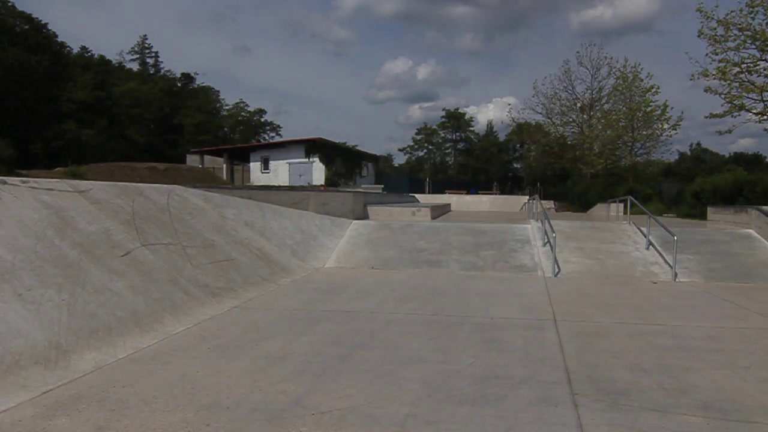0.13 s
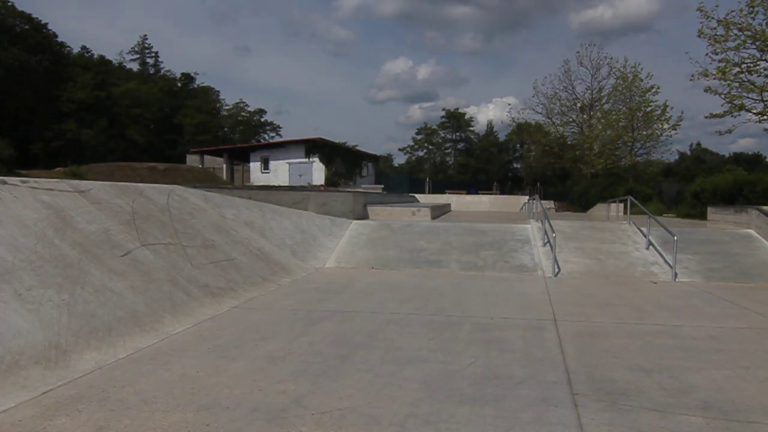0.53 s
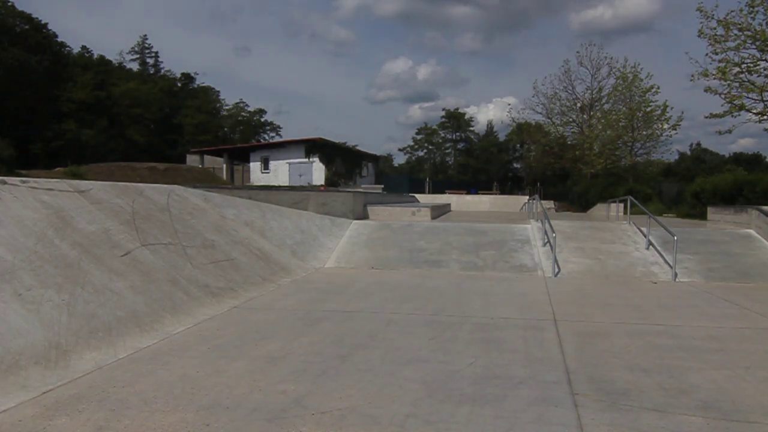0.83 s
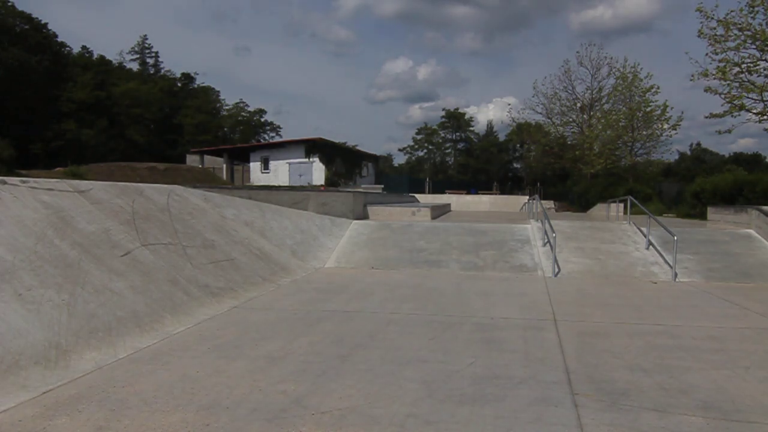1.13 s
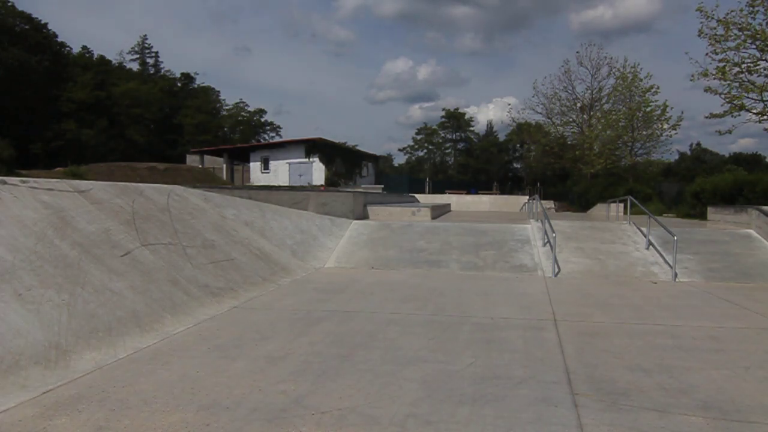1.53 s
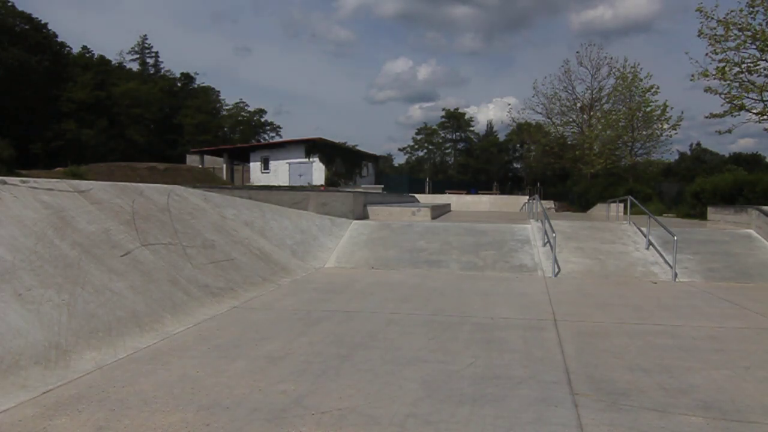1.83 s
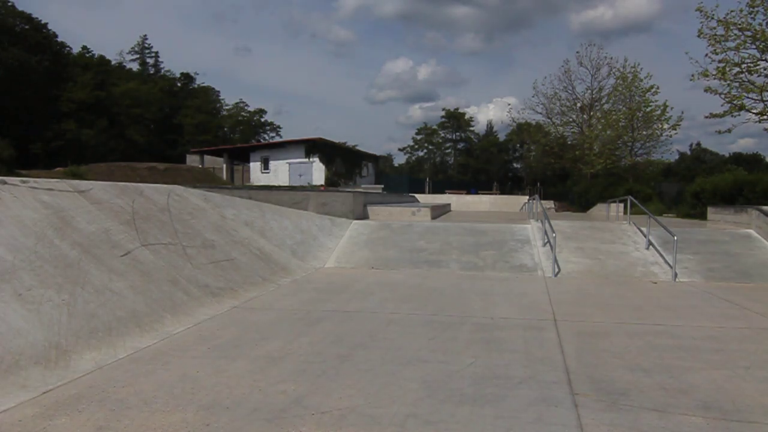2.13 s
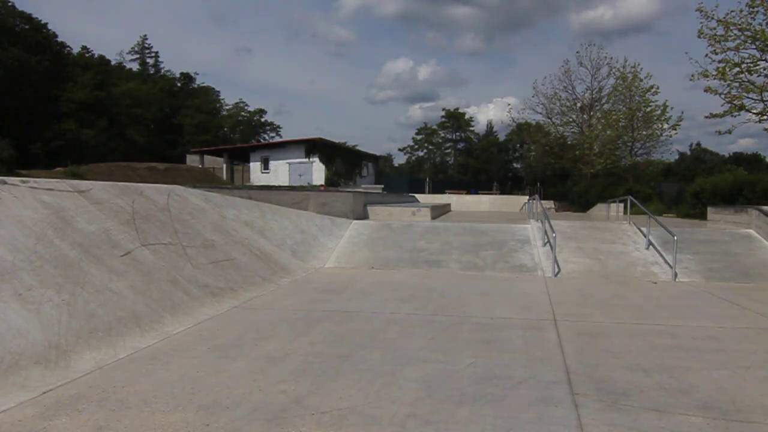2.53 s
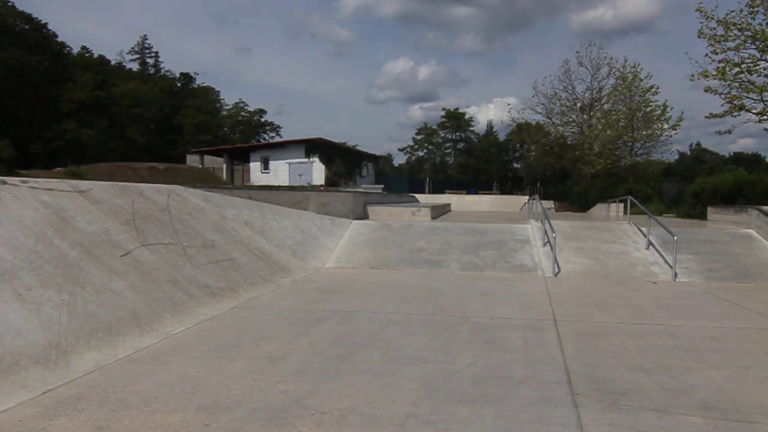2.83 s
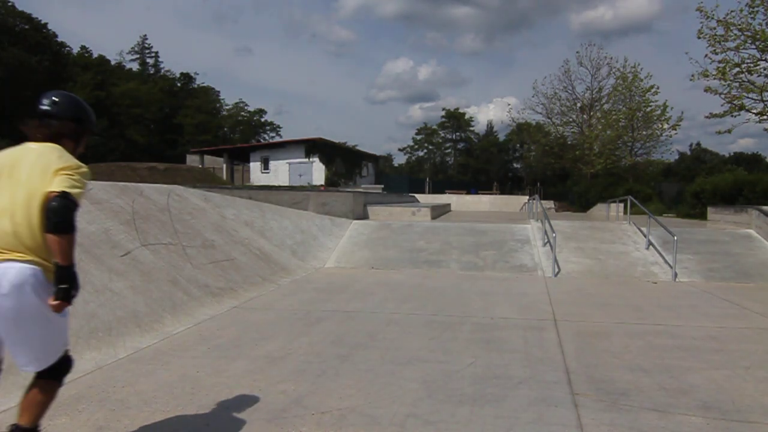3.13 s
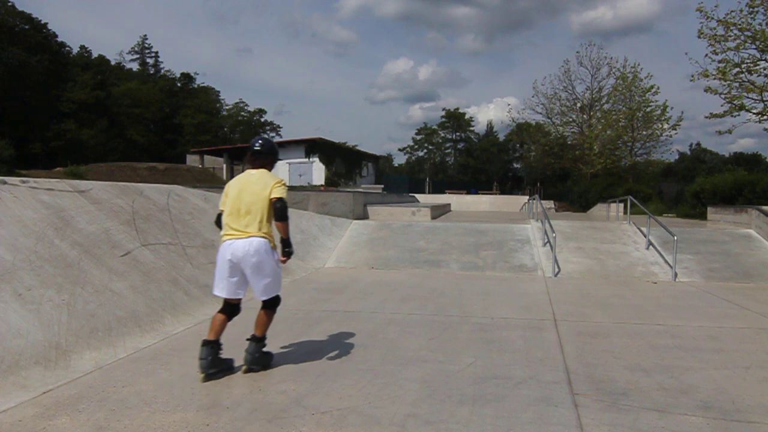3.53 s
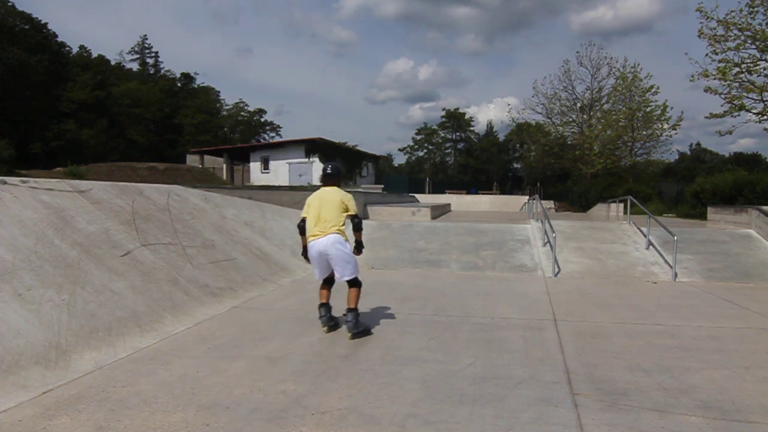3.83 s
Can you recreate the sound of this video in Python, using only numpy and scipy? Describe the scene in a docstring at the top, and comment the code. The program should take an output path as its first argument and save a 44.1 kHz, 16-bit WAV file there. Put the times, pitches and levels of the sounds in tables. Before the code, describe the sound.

Inline skate wheels hum faintly on concrete and grow louder, with a soft puff of wind at 0.7 seconds. A clack comes at 1.4 seconds and a louder cluster around 2.2. The wheels hiss, scuff near 2.7 and tick rapidly as they pass close by. More sharp, slightly echoing clacks land around 3.2 seconds, then the skates roll away with a thin swish near 3.9.

```python
"""A skater rolls past

An inline skater comes up across a concrete skatepark, passes close by and rolls away. The wheels drone, hiss on
the grit, scuff in a turn, tick as they slip and rattle, and clack on landings and joints. The ramps echo the
clacks and ticks, and a little wind rumbles on the microphone."""
import sys
import numpy as np
from scipy import signal
from scipy.fft import rfft, irfft, next_fast_len
from scipy.io import wavfile

SR = 44100
rng = np.random.default_rng(int(sys.argv[2]) if len(sys.argv) > 2 else 0)


def wav_out(sig):
    """Save sig, one row per channel (or a flat mono array), as 16-bit PCM at SR to the path in sys.argv[1]."""
    wavfile.write(sys.argv[1], SR, np.round(np.clip(np.atleast_2d(sig).T, -1, 1) * 32767).astype(np.int16))


N = 176400
T = np.arange(N) / SR

# How loud each sound is as time goes by. Each row: time in seconds, level in dB.
WIND_LEVELS = [(0, -59.5), (.62, -57.5), (.693, -30), (.72, -56), (2.4, -60), (4, -55)]
AIRY_LEVELS = [(0, -54.5), (.22, -56.5), (.45, -64), (2.6, -65), (3.2, -45.5), (3.5, -55)]
GRIT_LEVELS = [(0, -61), (1.1, -58), (1.82, -55.5), (1.88, -47.5), (2.3, -40.5), (2.56, -47), (2.85, -40.5),
               (3.25, -41), (3.35, -55), (3.55, -52.5), (3.63, -46.5), (4, -47)]
SCUFF_LEVELS = [(2.6, -50), (2.63, -43.5), (2.71, -33.5), (2.75, -36), (2.78, -35), (2.86, -48.5)]
# The drone of the wheels. Each row: time in seconds, level in dB, pitch of their ring in Hz.
DRONE_CURVE = [(0, -54, 1080), (.4, -51.5, 1077), (1.6, -46.5, 1095), (2.2, -42, 1060), (3.2, -41.5, 1027),
               (3.45, -42.5, 969), (4, -41, 965)]

# The tone of each sound, from bass to treble. Each row: frequency in Hz, relative strength in dB.
WIND_TONE = [(28, -22), (95, -8), (165, -20), (1200, -79)]
AIRY_TONE = [(4000, -18), (8500, -2), (16000, -4.5)]
GRIT_TONE = [(600, -3.5), (2200, 2), (3700, -2), (5200, -1.5), (9000, -14), (16000, -20.5)]
DRONE_TONE = [(30, -9), (80, -2), (230, 0), (550, -4), (1200, 1), (1700, -8.5), (5000, -23.5), (16000, -66)]
SCUFF_TONE = [(90, -16), (200, -26), (600, -3.5), (2300, -1), (6000, -9.5), (14000, -27)]
HIGH_TICK_TONE = [(2500, -23), (4900, 6), (9000, -9), (12500, -24)]
LOW_TICK_TONE = [(1100, -26), (2600, -11), (5500, -34.5)]
KNOCK_TONE = [(120, -9), (380, -1.5), (780, -3), (1200, -2.5), (1600, -13.5), (8000, -38)]
CRACK_TONE = [(600, -26.5), (1900, 5), (3200, 1.5), (5700, -1), (15000, -28)]
SPLASH_TONE = [(3500, 6), (8800, -1.5), (10300, 5.5), (15000, -10)]

# Thin squeaks, and a bright swish as the skater carves away. Each row: start and length in seconds,
# level in dB, first and last pitch in Hz, width of the band in Hz.
THIN_SQUEAKS = [(.078, 0.059, -40, 3600, 3980, 220), (2.071, 0.012, -36.5, 3800, 3580, 500),
                (3.97, .028, -33.5, 4930, 6020, 600)]
CARVING_SWISH = [(3.783, 0.22, -34.5, 13100, 7800, 5940)]
# The squeal of the tread. Each row: pitch in Hz, width of the band in Hz, relative level in dB.
TREAD_SQUEALS = [(1850, 450, -6), (4900, 1000, -7)]
# Ticks of the wheels: slips of the tread, and at 2.34-2.42 s and 3.43-3.46 s a rattle once per turn of a wheel.
# Each row: start in seconds, relative levels of the high and low ring in dB.
WHEEL_TICKS = [(2.338, -32, -49), (2.356, -27, -66), (2.3979, -26.5, -43), (2.416, -29.5, -47),
               (2.9125, -39, -34), (2.9273, -28.5, -35), (2.935, -28, -31.5), (2.953, -26, -33),
               (2.967, -27, -34), (2.985, -24.5, -32.5), (2.9952, -24, -35), (3.017, -25.5, -39),
               (3.039, -24.5, -35), (3.0546, -24.5, -38), (3.0617, -26, -39), (3.1144, -29, -31.5),
               (3.369, -41, -36), (3.386, -46, -34.5), (3.4261, -28, -47), (3.4392, -27.5, -41.5),
               (3.456, -28.5, -42), (3.695, -44, -31.5), (3.7096, -38, -33)]
# Hits on landings and joints. Each row: start in seconds, boot thump in dB, thump pitch in Hz,
# frame knock in dB, crack in dB, splash of grit in dB, fade time of those last three in seconds.
WHEEL_HITS = [(.932, -57, 300, -37.5, -42.5, -64, 0.0075), (1.106, -48, 203, -42.5, -55, -69, 0.011),
              (1.397, -14.5, 304, -21.5, -22.5, -33, 0.012), (1.596, -42, 302, -36.5, -48, -66, 0.0083),
              (2.131, -19, 274, -25, -32, -48, 0.037), (2.183, -2.5, 205.5, -19.5, -26, -32.5, 0.014),
              (2.262, -13, 163.4, -17.5, -25, -34, 0.0075), (2.277, -22, 312, -25, -46, -53, 0.008),
              (2.788, -19, 215.2, -22, -37, -34.5, 0.0077), (2.843, -16, 242, -26, -18.5, -31, 0.0055),
              (3.179, -21, 270, -23.5, -24, -32, 0.0075), (3.220, -3, 205, -17, -38, -19, 0.0051),
              (3.237, -35, 303, -32, -39, -22.5, 0.0017), (3.277, -7, 209.2, -19.5, -24.5, -19.5, 0.0066)]
# How boot and frame ring. Each row: multiple of the thump pitch, relative dB, seconds to fade by 60 dB.
BOOT_RINGS = [(1, 5.5, 0.034), (1.92, 4, 0.03), (3.6, -16.5, 0.036)]

GRAINS_PER_S, GRAIN_SPREAD_DB, GRIT_FLUTTER_DB = 5000, 4.5, 1.3
WHEEL_RING_DB, WHEEL_RING_WIDTH_HZ, DRONE_FLUTTER_DB = -7, 220, 0.2
JUDDERS_PER_S, JUDDER_DB = 120, 7
HIGH_CLICK_BOOST_DB, LOW_CLICK_BOOST_DB = 13.5, 22
CLACK_RISE_S, CLACK_HOLD_S, THUMP_RISE_S = 0.0013, 0.0014, 0.0054
SPEED_M_PER_S, PASS_S, NEAREST_M = 5.4, 2.93, 2.24
ECHO_DB_AT_1_M, ECHO_FADE_S, ECHO_DELAY_S, ECHO_BAND_HZ = -25.5, 0.33, 0.0086, (326, 11300)
BASS_CUT_HZ, TREBLE_CUT_HZ = 40, 15900


def from_db(db):
    """Turn decibels into a number to multiply by."""
    return 10 ** (np.asarray(db) / 20)


def unit_power(x):
    """Scale a signal so that its average power is 1."""
    return x / np.sqrt(np.mean(x ** 2) + 1e-20)


def curves(rows):
    """Join the rows with straight lines: one curve for each column after the time."""
    times, *columns = np.transpose(rows)
    return [np.interp(T, times, column) for column in columns]


def shape_tone(x, tone):
    """Filter a sound to follow a tone table; white noise keeps its power."""
    size = next_fast_len(N + SR // 2) * 2
    hz, db = np.transpose(tone)
    log_hz = np.log(np.fft.rfftfreq(size, 1 / SR) + 1)
    gain = unit_power(from_db(np.interp(log_hz, np.log(hz), db)))
    # These steps make the filter ring only after a hit, never before it.
    cepstrum = irfft(np.log(gain))
    cepstrum[1:size // 2] *= 2
    cepstrum[size // 2 + 1:] = 0
    return irfft(rfft(x, size) * np.exp(rfft(cepstrum)))[:N]


def drift(rate_hz):
    """A smooth random wobble, about 1 in size, at up to roughly this rate."""
    hz = np.fft.rfftfreq(N, 1 / SR)
    spectrum = rfft(rng.standard_normal(N)) / (1 + (hz / rate_hz) ** 4)
    return unit_power(irfft(spectrum, N))


def noise(tone):
    """Steady noise with the given tone."""
    return shape_tone(rng.standard_normal(N), tone)


def noisy_ring(hz, width_hz):
    """A rough ringing note whose pitch may move."""
    phase = 2 * np.pi * np.cumsum(hz * np.ones(N)) / SR
    return unit_power(drift(width_hz / 2) * np.cos(phase) + drift(width_hz / 2) * np.sin(phase))


def bursts(rows, rise_s, hold_s):
    """Short bursts of noise. Each row: start in seconds, level in dB, fade time in seconds."""
    power = np.zeros(N)
    for start, db, fade_s in rows:
        age = T[T >= start][:SR // 4] - start
        shape = np.minimum(age / rise_s, 1) * np.exp(-np.maximum(age - hold_s, 0) / fade_s)
        power[np.searchsorted(T, start):][:len(age)] += (from_db(db) * shape) ** 2
    return np.sqrt(power) * rng.choice([-1, 1], N)


def wind():
    """Wind rumbles softly on the microphone, with one short puff."""
    return noise(WIND_TONE) * from_db(curves(WIND_LEVELS)[0])


def ramp_echo(sound):
    """The ramps scatter sound back; the farther the skater, the larger the echo's share."""
    distance_m = np.hypot(NEAREST_M, SPEED_M_PER_S * (T - PASS_S))
    age = T[:SR // 2]
    tail = rng.standard_normal(len(age)) * from_db(-60 * age / ECHO_FADE_S) * (age > ECHO_DELAY_S)
    band = signal.butter(2, ECHO_BAND_HZ, "band", fs=SR, output="sos")
    tail = signal.sosfilt(band, tail / np.linalg.norm(tail))
    return from_db(ECHO_DB_AT_1_M) * signal.fftconvolve(sound * distance_m, tail)[:N]


def airy_hiss(flutter_db=2.8, bounce_gain=.4, bounce_delay_s=.00068):
    """The highest hiss of the wheels mixes with its own bounce off the ground."""
    hiss = noise(AIRY_TONE) * from_db(curves(AIRY_LEVELS)[0] + flutter_db * drift(50))
    return hiss + bounce_gain * np.interp(T - bounce_delay_s, T, hiss)


def grit_hiss():
    """The tread hits thousands of tiny, uneven grains, which blur into a hiss."""
    sizes = from_db(GRAIN_SPREAD_DB * np.minimum(rng.exponential(1, N), 5))
    signs = rng.choice([-1, 1], N)
    grains = unit_power(sizes * signs * (rng.random(N) < GRAINS_PER_S / SR))
    loudness = from_db(curves(GRIT_LEVELS)[0] + GRIT_FLUTTER_DB * drift(51))
    return shape_tone(grains * loudness, GRIT_TONE)


def wheel_drone():
    """Rolling on concrete makes the wheels rumble and ring."""
    db, hz = curves(DRONE_CURVE)
    loudness = from_db(db + DRONE_FLUTTER_DB * drift(30))
    rumble = noise(DRONE_TONE)
    ring = from_db(WHEEL_RING_DB) * noisy_ring(hz, WHEEL_RING_WIDTH_HZ)
    return loudness * (rumble + ring)


def squeaks_and_swish():
    """Each squeak or swish swells and fades while its pitch slides."""
    out = np.zeros(N)
    for start, length, db, first_hz, last_hz, width_hz in THIN_SQUEAKS + CARVING_SWISH:
        progress = np.clip((T - start) / length, 0, 1)
        hz = first_hz + (last_hz - first_hz) * progress
        out += from_db(db) * np.sin(np.pi * progress) ** 2 * noisy_ring(hz, width_hz)
    return out


def turn_scuff():
    """In the turn the tread grips and slips unevenly; each slip rasps and squeals."""
    turning = (T > SCUFF_LEVELS[0][0]) & (T < SCUFF_LEVELS[-1][0])
    slips_per_s = JUDDERS_PER_S * (1 + .5 * drift(JUDDERS_PER_S / 2))
    judder = np.sin(2 * np.pi * np.cumsum(slips_per_s) / SR)
    squeal = sum(from_db(db) * noisy_ring(hz, width_hz) for hz, width_hz, db in TREAD_SQUEALS)
    friction = turning * from_db(curves(SCUFF_LEVELS)[0] + JUDDER_DB * judder)
    rasp = shape_tone(friction * rng.standard_normal(N), SCUFF_TONE)
    return rasp + friction * squeal


def wheel_ticks(fade_s=.002):
    """Each tick of the wheels, whether a slip of the tread or a rattle once per turn of a wheel, is a click and
    a brief rasp that set off a high and a low ring."""
    starts, high_db, low_db = np.transpose(WHEEL_TICKS)
    high_clicks, low_clicks = np.zeros((2, N))
    at = (starts * SR).astype(int)
    high_clicks[at] = from_db(high_db + HIGH_CLICK_BOOST_DB)
    low_clicks[at] = from_db(low_db + LOW_CLICK_BOOST_DB)
    rasp = bursts([(start, db, fade_s) for start, db in zip(starts, low_db)], rise_s=.0012, hold_s=.00033)
    return shape_tone(high_clicks + rasp, HIGH_TICK_TONE) + shape_tone(low_clicks + rasp, LOW_TICK_TONE)


def clacks():
    """Each hit thumps the boot, knocks the frame, cracks and throws up grit."""
    starts, thump_db, thump_hz, knock_db, crack_db, splash_db, fade_s = np.transpose(WHEEL_HITS)
    out = np.zeros(N)
    for start, db, hz in zip(starts, thump_db, thump_hz):
        age = T[T >= start][:SR // 4] - start
        thump = sum(from_db(db + ring_db - 60 * age / ring_s) * np.sin(2 * np.pi * hz * multiple * age)
                    for multiple, ring_db, ring_s in BOOT_RINGS)
        out[np.searchsorted(T, start):][:len(age)] += thump * (1 - np.exp(-age / THUMP_RISE_S))
    for db, tone in ((knock_db, KNOCK_TONE), (crack_db, CRACK_TONE), (splash_db, SPLASH_TONE)):
        hits = bursts(zip(starts, db, fade_s), CLACK_RISE_S, CLACK_HOLD_S)
        out += shape_tone(hits, tone)
    return out


def scene():
    """Add the wind, the skater and the echo together in one channel."""
    contacts = clacks() + wheel_ticks()
    mix = wind() + wheel_drone() + grit_hiss() + turn_scuff()
    mix += contacts + ramp_echo(contacts)
    mix += airy_hiss() + squeaks_and_swish()
    return mix[None]


def record(dry):
    """The microphone drops the deepest bass, and the highest treble is cut steeply."""
    bass_cut = signal.butter(4, BASS_CUT_HZ, "high", fs=SR, output="sos")
    treble_cut = signal.ellip(12, .1, 90, TREBLE_CUT_HZ, fs=SR, output="sos")
    return signal.sosfilt(treble_cut, signal.sosfilt(bass_cut, dry))


dry = scene()
out = record(dry)
wav_out(out)
```